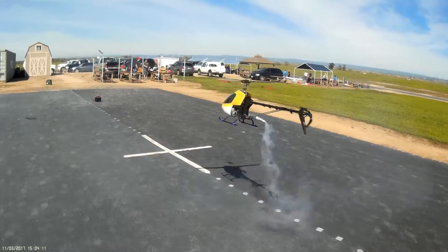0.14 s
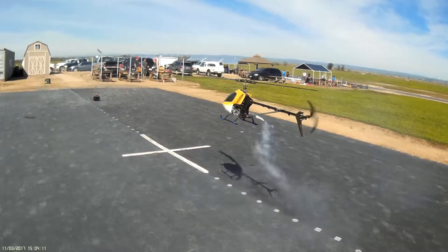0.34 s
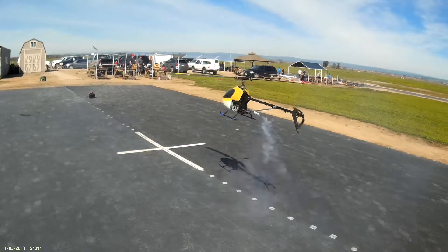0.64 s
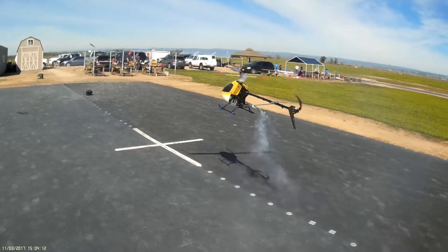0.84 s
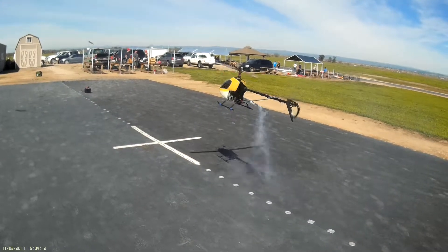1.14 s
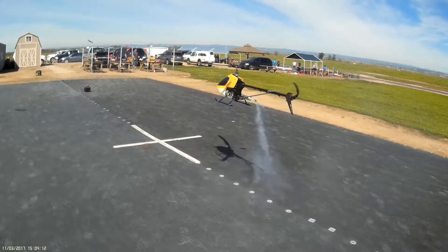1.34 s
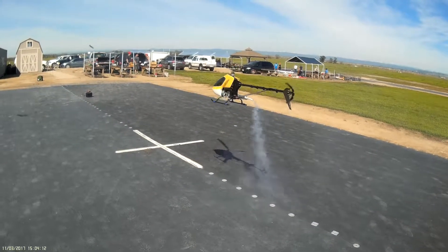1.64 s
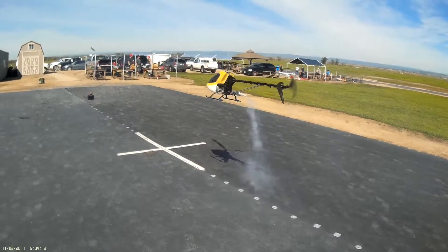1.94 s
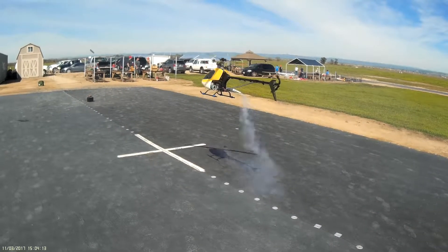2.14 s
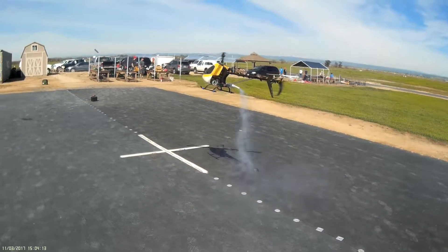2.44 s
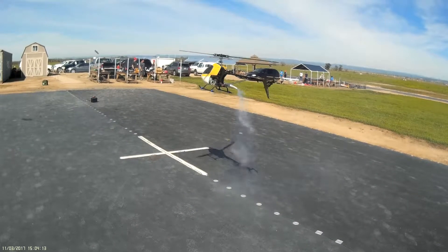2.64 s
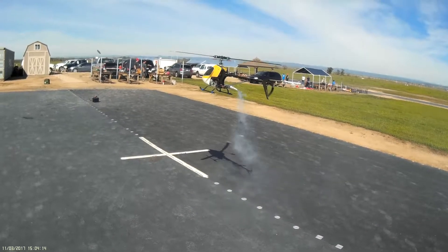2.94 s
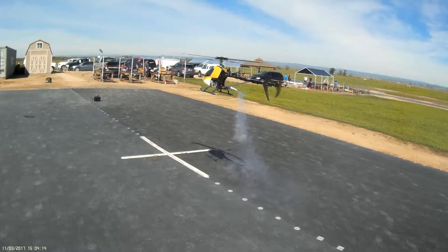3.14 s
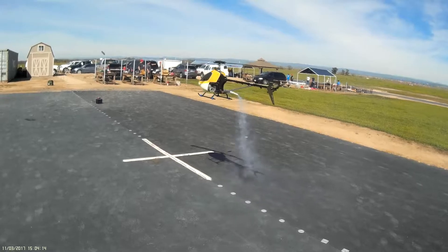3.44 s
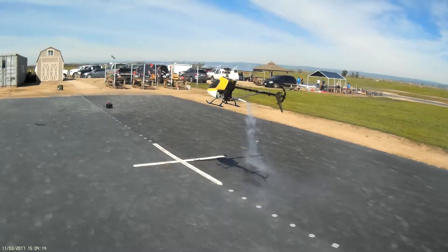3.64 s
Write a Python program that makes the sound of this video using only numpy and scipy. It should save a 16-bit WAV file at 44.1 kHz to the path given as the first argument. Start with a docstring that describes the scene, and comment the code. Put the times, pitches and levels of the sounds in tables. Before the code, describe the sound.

Steady harsh buzz of a tiny two-stroke helicopter engine, running from start to end at nearly constant speed. A shrill, rough gear whine swells and dips over gritty exhaust rasp and rattle, in open air with little echo.

```python
"""The exhaust of a small two-stroke engine buzzes at about 200 firings a second, a harmonic series shaped by its muffler.
It drives a model helicopter hovering over an asphalt pad. Through a slightly slipping clutch the crankshaft turns
a whining main gear, the main rotor and the tail rotor, all sums of sines locked to one rotation.
The passing blades modulate the buzz; filtered noise gives the exhaust rasp, the gear rattle and a faint downwash."""
import sys
import numpy as np
from scipy import signal
from scipy.fft import rfft, irfft
from scipy.io import wavfile
from scipy.ndimage import uniform_filter1d, map_coordinates

SR = 44100
rng = np.random.default_rng(int(sys.argv[2]) if len(sys.argv) > 2 else 0)


def store_wav(level_fs):
    """Save 16-bit WAV to argv[1]."""
    pcm = np.round(np.clip(np.atleast_2d(level_fs), -1, 1) * 32767)
    wavfile.write(sys.argv[1], SR, pcm.T.astype(np.int16))


N = 167580
T = np.arange(N) / SR


def from_db(db):
    """Amplitude ratio: 20 dB is a factor of ten in gain."""
    return 10 ** (np.asarray(db) / 20)


def rms_one(x):
    """Power normalization: scale to an rms of 1."""
    return x / np.sqrt(np.mean(x ** 2) + 1e-20)


def in_time(rows):
    """Linear interpolation: each column of a curve table at every sample."""
    time_s, *columns = np.transpose(rows)
    return [np.interp(T, time_s, column) for column in columns]


def swell(db):
    """Amplitude modulation: a level curve in dB as a gain of rms 1, so only its shape counts."""
    return rms_one(from_db(db))


def drift(rate_hz):
    """Low-passed noise: a smooth random wander of spread 1."""
    step = 40  # samples between the points of the slow noise
    pole = np.exp(-2 * np.pi * rate_hz * step / SR)
    white = rng.standard_normal(N // step + 2002)
    slow = signal.lfilter([1], [1, -2 * pole, pole * pole], white)[2000:]  # drop the filter's start
    slow = rms_one(slow - slow.mean())
    return np.interp(np.arange(N) / step, np.arange(len(slow)), slow)


def tone(turns, db):
    """Pure tone: a sine of the given rms level, its phase counted in turns."""
    return np.sqrt(2) * from_db(db) * np.cos(2 * np.pi * turns)


FADE_DB = 1.5  # spread of the random fading


def levels_in_time(curves, multiples, steady, fade_hz):
    """Harmonic spectrum in time: level in dB of each multiple, from a curve or fading at random around its level."""
    levels = {round(k): db + FADE_DB * drift(fade_hz) for k, db in steady}
    levels.update(zip(multiples, in_time(curves)))
    return levels


CHOP_DEPTH, CHOP_SHARPNESS = 0.29, 1  # depth before scaling to rms 1


def blade_chop(rotor):
    """Reflection: each of the two passing blades throws back some of the exhaust, a brief rise in gain."""
    passing = np.exp(CHOP_SHARPNESS * (np.cos(2 * np.pi * 2 * rotor) - 1))
    return rms_one(1 + CHOP_DEPTH * passing)


FIRING_JITTER_TURNS, HUNT_TURNS = .002, .002  # fast and slower wander of the firing moment
FIRING_ROUGH = 0.033  # spread in the strength of the puffs
# Steady exhaust harmonics, fading only slightly: multiple of the firing rate, level_db
STEADY_HARMONICS = [(1, -45), (4, -31.5), (8, -28.5), (9, -36.5), (10, -42.5), (11, -64), (13, -40.5),
                    (14, -37.5), (16, -38), (17, -47), (18, -49.5), (19, -57), (20, -53), (21, -42.5),
                    (22, -40), (23, -43), (24, -45), (25, -43), (26, -37), (27, -46), (28, -56), (29, -50),
                    (30, -57), (31, -50)]
# Exhaust harmonics that swell widely: multiple of the firing rate
SWELLING_MULTIPLES = (2, 3, 5, 6, 7, 12, 15)
# Their swells as the model drifts and turns: time_s, then level_db of harmonics 2, 3, 5, 6, 7, 12, 15
EXHAUST_SWELLS = [(0.0, -22, -27, -50, -25.5, -36.3, -30, -28),
                  (0.29, -22, -25, -33, -28.5, -55, -25.5, -29),
                  (0.58, -22.2, -30, -33.6, -38.0, -31, -24, -34.6),
                  (0.88, -22.5, -28.5, -37.7, -32, -71, -32.5, -33),
                  (1.17, -23, -29, -34, -36, -29.5, -30, -54),
                  (1.46, -22.9, -28.7, -31, -51, -28, -29.5, -32),
                  (1.75, -23, -28, -28.5, -38, -31.5, -23, -28),
                  (2.05, -24, -27.0, -31, -32.1, -40, -23.0, -31),
                  (2.34, -24, -27.3, -32, -28.9, -33, -24.5, -30),
                  (2.63, -27.5, -29, -31, -29, -33, -27.5, -55),
                  (2.92, -26.5, -29, -37, -29.5, -32, -29, -55),
                  (3.22, -27.2, -28.7, -31.5, -31, -32, -26.0, -56),
                  (3.51, -25, -28, -29.5, -35.0, -40, -24, -37),
                  (3.8, -24.2, -25.5, -34, -54, -49, -23.9, -23.5)]


def exhaust(crank, rotor):
    """Harmonic series and minimum phase: one uneven puff per revolution, made to ring by the muffler's resonances."""
    turns = crank + FIRING_JITTER_TURNS * drift(69) + HUNT_TURNS * drift(16)
    levels = levels_in_time(EXHAUST_SWELLS, SWELLING_MULTIPLES, STEADY_HARMONICS, fade_hz=1)
    means_db = [levels[k].mean() for k in sorted(levels)]
    # The Hilbert transform of the log spectrum gives the delay of each harmonic as a phase in turns
    log_spectrum = np.log(from_db(np.r_[min(means_db), means_db]))
    mirrored = np.r_[log_spectrum, log_spectrum[:0:-1]]
    lags_turns = -signal.hilbert(mirrored).imag / (2 * np.pi)
    buzz = sum(tone(k * turns + lags_turns[k], db) for k, db in levels.items())
    puff_strength = 1 + FIRING_ROUGH * drift(90)
    return buzz * puff_strength * blade_chop(rotor)


BREAKS_PER_S, BREAK_DB, BREAK_RECOVERY_S = 22, 7, 0.0039  # dB before smoothing and scaling to rms 1


def breaks():
    """Exponential recovery: the whine drops abruptly at random moments and builds up again."""
    starts = rng.random(N) < BREAKS_PER_S / SR
    decay = np.exp(-1 / (BREAK_RECOVERY_S * SR))
    depth = signal.lfilter([1], [1, -decay], starts + 1e-18)
    smooth_depth = uniform_filter1d(np.minimum(depth, 2), size=60)
    return swell(-BREAK_DB * smooth_depth)


RUNOUT_TURNS, GEAR_JITTER_TURNS = 0.0078, 0.006  # regular and random phase swing, in pinion turns
RUNOUT_SWING, GEAR_ROUGH = 0.071, 0.054  # regular and random swing in strength
# Gear tones near a steady level: multiple of the pinion rate, level_db
STEADY_GEAR_TONES = [(17, -37), (18, -41.5), (19, -45.5), (27, -40.5), (28, -51)]
# Gear tones with large swells: multiple of the pinion rate
WHINE_MULTIPLES = (8, 9, 10, 26)
# Their levels: time_s, then level_db at 8, 9, 10 and 26 times the pinion rate
WHINE_LEVELS = [(0.0, -19, -15.9, -35, -31), (0.25, -49, -14.5, -28, -32), (0.51, -36, -14.5, -34, -45),
                (0.76, -41, -19, -29, -44), (1.01, -36, -24, -29, -44), (1.27, -52, -24.2, -30, -38),
                (1.52, -44, -22, -32.2, -36), (1.77, -30, -20, -40, -28.5), (2.03, -55, -17, -39.3, -27),
                (2.28, -28, -16.5, -35, -28.5), (2.53, -25.5, -17, -45, -60), (2.79, -44, -19.5, -55, -52),
                (3.04, -44, -19.5, -31, -40.6), (3.29, -46, -19, -38, -49), (3.55, -41, -17.5, -32, -54),
                (3.8, -38, -19.5, -45, -40.7)]


def main_gear(pinion, rotor):
    """Tooth meshing: nine meshes per pinion turn, side tones from uneven teeth, a wobble per turn of the large gear."""
    turns = pinion + RUNOUT_TURNS * np.sin(2 * np.pi * rotor) + GEAR_JITTER_TURNS * drift(56)
    levels = levels_in_time(WHINE_LEVELS, WHINE_MULTIPLES, STEADY_GEAR_TONES, fade_hz=7.5)
    whine = 0
    for k, db in levels.items():
        whine = whine + tone(k * turns + rng.random(), db) * (1 + GEAR_ROUGH * drift(54))
    return whine * breaks() * (1 + RUNOUT_SWING * np.cos(2 * np.pi * rotor))


# Main rotor tones: multiple of the blade rate, level_db
MAIN_ROTOR_TONES = [(1, -50), (2, -53), (3, -58), (4, -52), (5, -51), (6, -50), (7, -46)]
# Tail rotor tones: multiple of the blade rate, level_db
TAIL_ROTOR_TONES = [(1, -42), (2, -45), (3, -46), (4, -44)]


def blades(turns, tones):
    """Blade-passing tones: two blades hum at multiples of twice the turning rate, each swelling at random."""
    hum = 0
    for k, db in tones:
        hum = hum + tone(2 * round(k) * turns + rng.random(), db) * swell(1.4 * drift(2.7))
    return hum


def earlier(x, turns, count):
    """Cyclic repetition: the sound as it was a number of turns before, silent until then."""
    source = np.interp(turns - count, turns, np.arange(N), left=N - 1)
    return x[np.round(source).astype(int)] * (turns >= count)


GROUND_SHARE, GROUND_DELAY_S = .25, .0019
GROUND_SWAY_S, GROUND_SWAY_HZ = .00012, .4


def over_ground(x):
    """Comb filtering: the asphalt adds a reflection whose delay wanders as the model rises and sinks."""
    delay_s = GROUND_DELAY_S + GROUND_SWAY_S * drift(GROUND_SWAY_HZ)
    return x + GROUND_SHARE * map_coordinates(x, [(T - delay_s) * SR], order=3)


CHATTER_PER_S, CHATTER_DB, CHATTER_BUILD_S = 20, 5, .03


def chatter():
    """Relaxation: the frame's rattle collapses at random moments and builds up again; change of level in dB."""
    collapses = rng.random(N) < CHATTER_PER_S / SR
    age_s = T - np.maximum.accumulate(np.where(collapses, T, -1))
    return uniform_filter1d(-CHATTER_DB * np.exp(-age_s / CHATTER_BUILD_S), size=80)


RASP_DB, RASP_LOW_HZ = -18, 213  # overall level, low cutoff
RASP_PULSING = 0.045  # swing once per firing
RASP_PER_TURN, RASP_FLUTTER = 0.067, 0.043  # swing once and four times per rotor turn
RASP_FLICKER_DB = 0.51
# Shares of the noise that recur after one and two crank turns and one rotor turn
REPEAT_ONE_TURN, REPEAT_TWO_TURNS, REPEAT_ROTOR_TURN = 0.051, 0.043, 0.11
# Resonances of muffler and frame: pitch_hz, relative level_db per Hz
RASP_COLOUR = [(230,-9.5), (330,-9), (600,-12.5), (760,-8), (900,-5.5), (1100,-12), (1300,-11), (1480,-10),
               (1620,-2), (1720,-5), (1830,-0.5), (1950,-9.5), (2080,-7), (2200,-15), (2330,-10), (2420,-6),
               (2520,-8), (2850,-10), (3000,-3), (3250,-11.5), (3450,-9), (3900,-20.5), (4450,-13),
               (4950,-18.5), (5270,-8), (5600,-10.5), (5800,-13.5), (6550,-25.5), (7000,-22), (7300,-14.5),
               (7700,-14), (8150,-18), (8350,-19), (8720,-18.5), (9050,-18), (9550,-18), (10200,-27),
               (10800,-23), (11250,-29.5), (11850,-22.5), (12450,-20.5), (13000,-23), (13400,-31),
               (13900,-40)]
# Borders between the six frequency ranges: pitch_hz
RANGE_BORDERS = [1400, 2200, 3200, 3700, 6500]
# Swells of five ranges, only their shape counts: time_s, then level_db low, low middle, middle, treble, top
RANGE_LEVELS = [(0.0, -19, -18, -14, -21, -24.5), (0.15, -17, -16.5, -14.5, -23.5, -24.5),
                (0.3, -19.5, -19, -16, -21.5, -24.4), (0.5, -21, -19.5, -15, -23, -24.4),
                (0.8, -21, -19, -18.5, -24.5, -26.5), (1.1, -23.5, -18.5, -18, -25.5, -25.7),
                (1.4, -21.5, -17.5, -17, -26, -25.5), (1.65, -24, -20.5, -17.5, -23.5, -25.5),
                (1.92, -21, -18.5, -14.5, -24, -25), (2.15, -22, -23, -19.5, -25.5, -26),
                (2.4, -22.5, -22.5, -18, -23.5, -26), (2.8, -23.5, -19, -17.5, -23.5, -26),
                (3.15, -25, -22, -19.5, -24.5, -26.5), (3.42, -22.5, -18.5, -17, -24.5, -26),
                (3.6, -25.3, -22, -17, -25, -25.9), (3.8, -23.5, -19.5, -16.5, -21, -25.0)]
# Swell of the range from 3200 to 3700 Hz, only its shape counts: time_s, level_db
EDGE_LEVELS = [(0.05, -34), (0.07, -33), (1.29, -31.5), (2.58, -26.5), (3.67, -30), (3.72, -26)]


def rasp(crank, rotor):
    """Resonance filtering: gas and rattle noise coloured by muffler and frame, pulsing with firings and rotor."""
    hz = np.fft.rfftfreq(N, 1 / SR) + 1
    points_hz, points_db = np.transpose(RASP_COLOUR)
    colour = from_db(np.interp(np.log(hz), np.log(points_hz), points_db))
    colour = colour / np.sqrt(1 + (RASP_LOW_HZ / hz) ** 12)

    white = rng.standard_normal(N)
    one_turn = REPEAT_ONE_TURN * earlier(white, crank, count=1)
    two_turns = REPEAT_TWO_TURNS * earlier(white, crank, count=2)
    white = white + one_turn + two_turns
    white = white + REPEAT_ROTOR_TURN * earlier(white, rotor, count=1)
    coloured = irfft(rfft(over_ground(white)) * colour, N)
    spectrum = rfft(rms_one(coloured))

    low, low_middle, middle, treble, top = in_time(RANGE_LEVELS)
    edge, = in_time(EDGE_LEVELS)
    range_of_bin = np.searchsorted(RANGE_BORDERS, hz)
    noise = 0
    for k, db in enumerate((low, low_middle + chatter(), middle, edge, treble, top)):
        band = irfft(spectrum * (range_of_bin == k), N)
        noise = noise + band * swell(db + RASP_FLICKER_DB * drift(20))

    pulsing = 1 + RASP_PULSING * np.cos(2 * np.pi * crank)
    flutter = 1 + RASP_PER_TURN * np.cos(2 * np.pi * rotor) + RASP_FLUTTER * np.cos(2 * np.pi * 4 * rotor)
    high_pass = signal.butter(4, RASP_LOW_HZ, "high", fs=SR, output="sos")
    return from_db(RASP_DB) * signal.sosfilt(high_pass, noise * pulsing * flutter)


WASH_DB, WASH_LOW_HZ, WASH_TOP_HZ = -52, 50, 220


def downwash():
    """Turbulence noise: band-passed white noise as a faint low rush of air."""
    band_pass = signal.butter(2, [WASH_LOW_HZ, WASH_TOP_HZ], "band", fs=SR, output="sos")
    return from_db(WASH_DB) * rms_one(signal.sosfilt(band_pass, rng.standard_normal(N)))


CLUTCH_SLIP = .0022  # share of the engine speed lost
PINION_TEETH, GEAR_TEETH = 9, 84
TAIL_RATIO = 4.85  # tail rotor turns per main rotor turn
# Engine speed: time_s, revolutions per s
ENGINE_SPEED = [(0.15, 200.98), (0.47, 200.96), (0.6, 201.51), (0.74, 201.03), (0.91, 201.17),
                (0.98, 201.89), (1.06, 201.64), (1.38, 202.72), (1.58, 202.58), (1.74, 202.21),
                (1.88, 202.31), (2.25, 201.5), (2.47, 201.91), (2.76, 201.5), (3.08, 201.91),
                (3.38, 202.65), (3.66, 201.24), (3.8, 201.5)]


def scene():
    """Gear ratios: the crankshaft drives everything through the clutch and the gears."""
    speed, = in_time(ENGINE_SPEED)
    crank = np.cumsum(speed) / SR  # turns so far
    pinion = crank * (1 - CLUTCH_SLIP)
    rotor = pinion * PINION_TEETH / GEAR_TEETH
    engine = exhaust(crank, rotor)
    gear = main_gear(pinion, rotor)
    rotors = blades(rotor, MAIN_ROTOR_TONES) + blades(rotor * TAIL_RATIO, TAIL_ROTOR_TONES)
    mix = engine + gear + rotors + rasp(crank, rotor) + downwash()
    return mix[None]


HEADROOM, CUTOFF_HZ = .92, 13900


def record(dry):
    """Saturation and low-pass filtering: the highest peaks are rounded and the top is cut steeply."""
    rounded = dry / (1 + (dry / HEADROOM) ** 10) ** (1 / 10)
    low_pass = signal.ellip(12, .1, 90, CUTOFF_HZ, fs=SR, output="sos")  # ripple and stop-band in dB
    return signal.sosfilt(low_pass, rounded)


dry = scene()
out = record(dry)
store_wav(out)
```